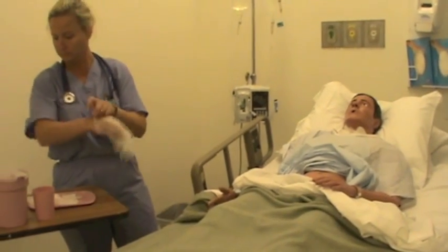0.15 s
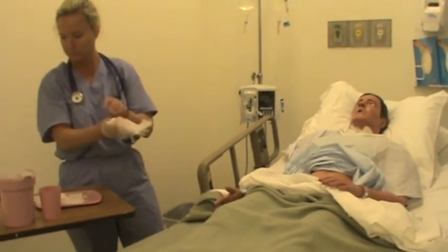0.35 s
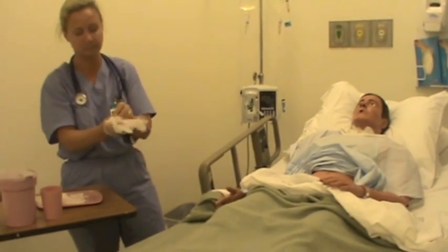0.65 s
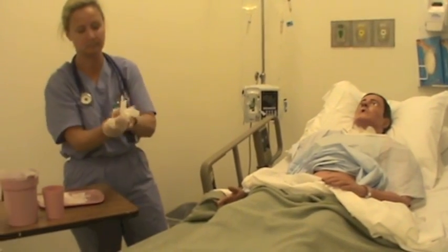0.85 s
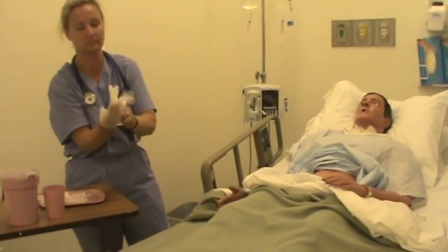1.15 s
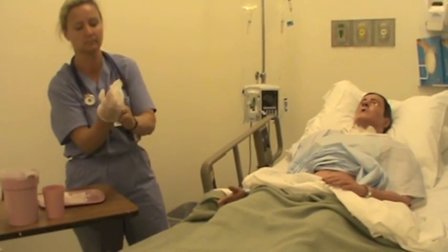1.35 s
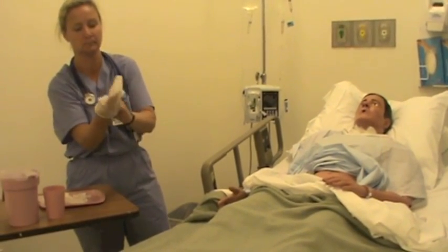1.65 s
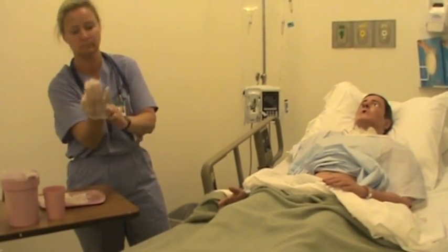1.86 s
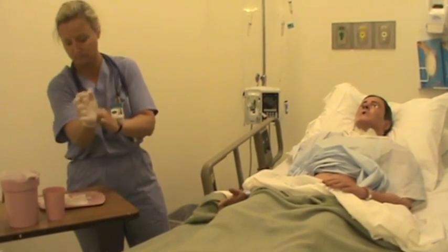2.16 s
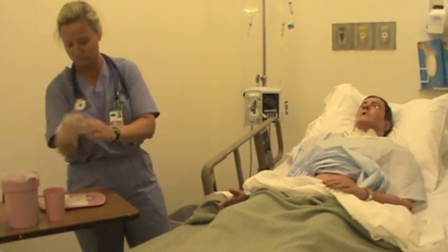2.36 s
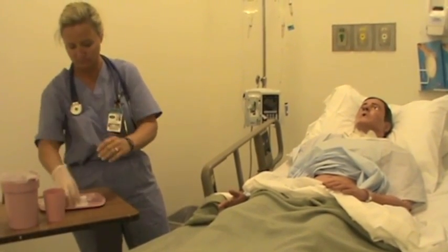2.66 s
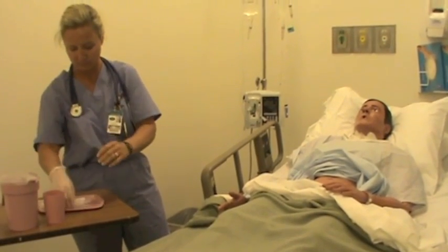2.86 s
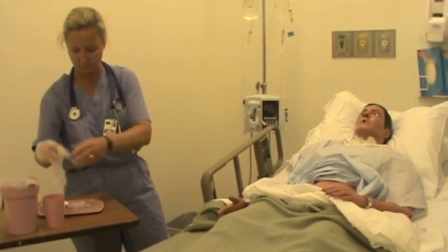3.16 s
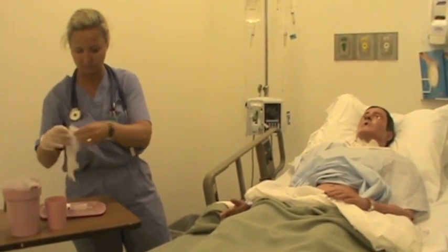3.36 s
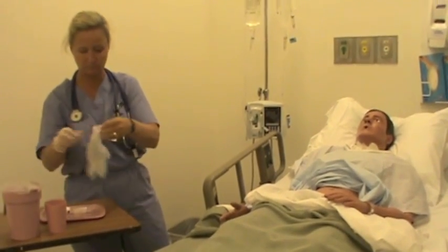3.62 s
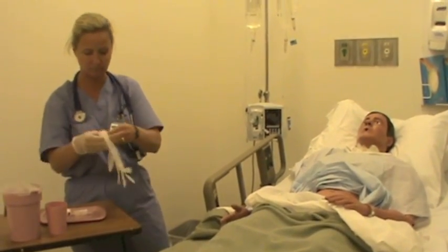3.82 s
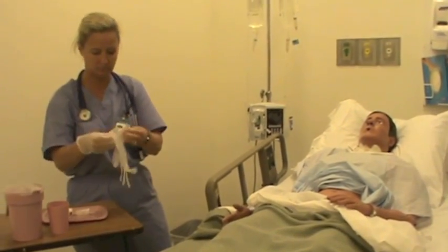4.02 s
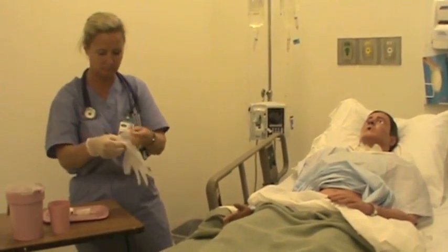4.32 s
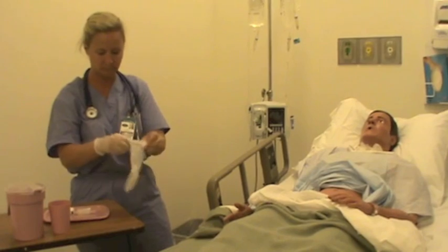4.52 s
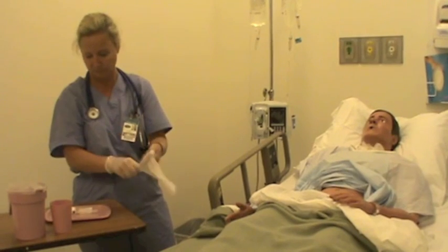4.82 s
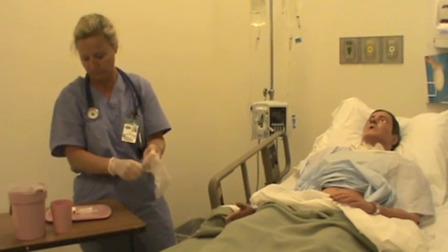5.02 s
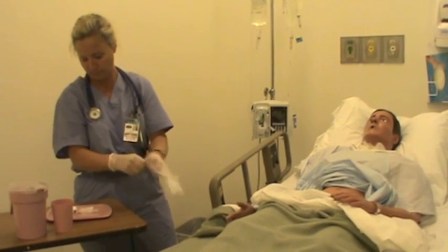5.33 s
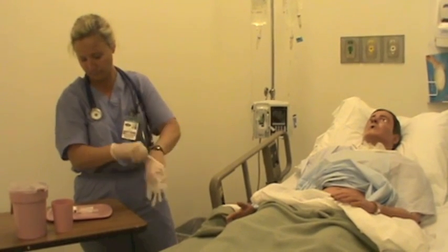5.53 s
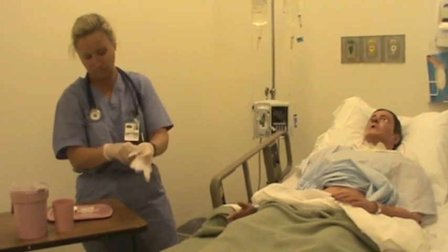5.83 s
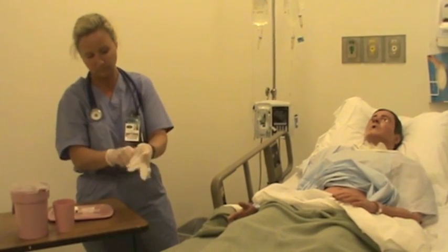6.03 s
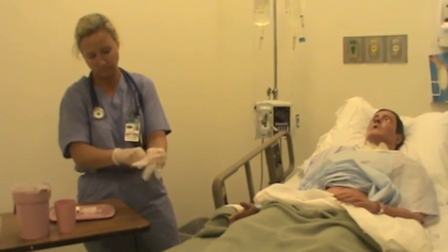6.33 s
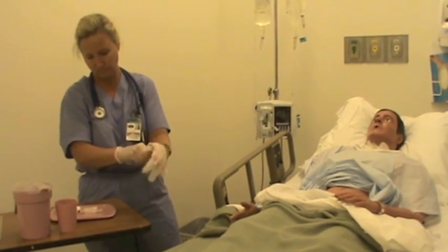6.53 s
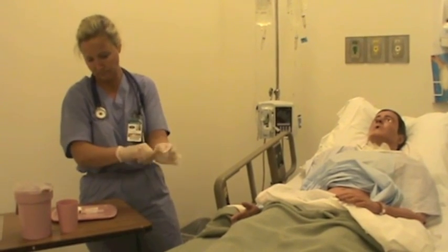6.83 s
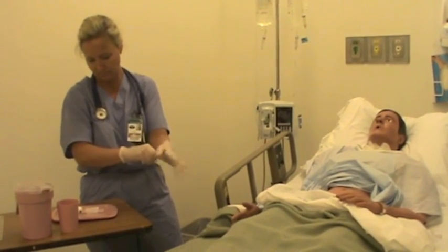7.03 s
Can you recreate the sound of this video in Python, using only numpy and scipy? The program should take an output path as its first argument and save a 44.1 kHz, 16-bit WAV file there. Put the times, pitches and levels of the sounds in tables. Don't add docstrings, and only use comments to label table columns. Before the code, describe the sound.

In a small quiet hospital room, thin stretchy gloves are pulled on close to a stereo microphone, slightly left. Rustling and an early cuff snap lead through pops to a hard, bright snap near two seconds. A quieter pause brings a few slaps, then the second glove crinkles, snaps and squeaks. Ventilation hums softly, and faint rapid motor ticks fade early.

```python
import sys
import numpy as np
from scipy import signal
from scipy.fft import rfft, irfft, next_fast_len
from scipy.io import wavfile
from scipy.ndimage import uniform_filter1d

SR = 44100
rng = np.random.default_rng(int(sys.argv[2]) if len(sys.argv) > 2 else 0)


def persist_wave(psi):
    counts = np.round(np.clip(psi, -1, 1) * 32767).astype(np.int16)
    wavfile.write(sys.argv[1], SR, np.atleast_2d(counts).T)


def ratio(d):
    e = np.asarray(d, float) / 20
    return 10 ** e


N = 316638


def evened(x):
    return x / np.sqrt(np.mean(x ** 2) + 1e-20)


def read(points, hz):
    f, value = np.transpose(points)
    return np.interp(np.log(hz + 1), np.log(f + 1), value)


def add(mix, s, sound):
    part = mix[round(s * SR):][:len(sound)]
    part += sound[:len(part)]


def band(x, lo_hz, hi_hz, order):
    sos = signal.butter(order, [lo_hz, hi_hz], "bandpass", fs=SR, output="sos")
    y = signal.sosfilt(sos, x)
    return y / abs(y).max()


def diffuse(pair, size):
    # (frequency [Hz], likeness [-1 to 1])
    likeness = [(60, 1), (130, 0.99), (290, 0.92), (640, 0.61), (1410, -0.52), (3100, 0.05), (6820, -0.039),
                (15000, 1)]
    hz, t, (a, b) = signal.stft(pair, SR, nperseg=size)
    same = np.clip(read(likeness, hz), -1, 1)[:, None]
    return hz, t, np.array([a, same * a + np.sqrt(1 - same ** 2) * b])


def air():
    # (frequency [Hz], level per Hz [dB])
    air_curve = [(12, -42), (20, -6.5), (68, 0), (158, -3), (260, -5), (354, -11), (618, -15), (772, -18.5),
                 (1510, -25), (1780, -26), (2290, -27.5), (5440, -30.5), (7190, -31), (9240, -33),
                 (15700, -37.5)]
    # (frequency [Hz], width [Hz], boost or cut [dB])
    ducts = [(37.7, 11.3, -8.5), (54, 17, 1.5), (84.6, 16, 0.5), (165.2, 12, 11), (449, 53, 2.5),
             (626, 63, 2.5), (1950, 230, 4.5)]
    level_db = -47.5
    hz, t, z = diffuse(rng.standard_normal((2, N)), size=4096)
    ducts_db = sum(db / (1 + (2 * (hz - f) / width) ** 2) for f, width, db in ducts)
    z = z * ratio(read(air_curve, hz) + ducts_db)[:, None]
    noise = signal.istft(z, SR, nperseg=4096)[1][:, :N]
    return ratio(level_db) * evened(noise)


def high_whine():
    whine_hz, whine_db = 15734, -83
    return ratio(whine_db) * np.sin(2 * np.pi * whine_hz * np.arange(N) / SR)


def zoom_motor():
    # (time [s], level [dB])
    tick_levels = [(.2, -58), (.4, -50), (.6, -51), (.75, -52), (1.05, -52), (1.5, -56), (1.7, -70)]
    first_s, steps_per_s, ring_hz, peak_s = .2065, 29.97, 2370, .003
    at = np.arange(first_s, tick_levels[-1][0], 1 / steps_per_s)
    levels_db = np.interp(at, *np.transpose(tick_levels)) + 1.5 * rng.standard_normal(len(at))
    t = np.arange(900) / SR
    ring = np.sin(2 * np.pi * ring_hz * t) * t / peak_s * np.exp(1 - t / peak_s)
    out = np.zeros(N)
    for s, db in zip(at, levels_db):
        add(out, s, ratio(db - 3.5) * ring)
    return np.array([1.4 * out, -.2 * out])


def ward(x):
    # (frequency [Hz], time [s])
    fading = [(300, 0.2), (700, 0.16), (1700, 0.14), (4600, 0.15), (12000, 0.18)]
    # (delay [ms], level [dB])
    echoes = [
        (3.4, -21),
        (7.5, -15),
        (12.5, -32),
        (18, -23.5),
        (27, -32),
    ]
    taps = np.zeros((2, SR // 2))
    slots = np.arange(300, SR // 2 - 20, 20)
    at = slots + rng.integers(0, 20, (2, len(slots)))
    np.put_along_axis(taps, at, rng.choice([-1., 1.], at.shape), 1)
    hz, t, z = diffuse(taps, size=256)
    z = z * ratio(-60 * t / read(fading, hz)[:, None])
    tail = signal.istft(z, SR, nperseg=256)[1]
    tail = ratio(-8.0) * tail / np.linalg.norm(tail[0])
    for k, (ms, db) in enumerate(echoes):
        at_ports = np.array([[1, 0], [0.025, (-1) ** k]])
        tail[:, round(ms * SR / 1000) + np.array([0, 9])] += ratio(db) * at_ports
    return signal.fftconvolve(x[None], tail, axes=1)[:, :N]


def ports(x):
    # (frequency [Hz], phase [radians])
    lead = [(0, -0.8), (1210, 1.2), (2840, 0.79), (5770, 0.48), (7410, 1.37), (10400, -1.3), (12400, -0.61),
            (16500, -0.087)]
    # (frequency [Hz], level [dB])
    left_extra = [(60, 0), (550, 0), (1500, 1.5), (3100, 1.5), (7000, 2), (11000, .5), (15000, 0)]
    size = next_fast_len(N)
    hz = np.fft.rfftfreq(size, 1 / SR)
    step = ratio(read(left_extra, hz) / 2) * np.exp(.5j * read(lead, hz))
    return irfft(rfft(x, size) * np.array([step, 1 / step]), size)[:, :N]


def strokes(t, low, high):
    # (peak time [s], level [dB], rise [ms], fall [ms], brightness [dB])
    first_glove = [(.005, -52.5, 30, 47, 5), (.115, -52, 74, 61, 2.5), (.2, -54.5, 53, 49, 3.5),
                   (.37, -54.5, 88, 144, 1), (.65, -62.5, 60, 71, -8), (.8, -58.5, 90, 130, 5),
                   (.98, -59.5, 130, 60, -11), (1.11, -52, 96, 140, -3), (1.23, -49.5, 150, 72, -3),
                   (1.36, -56, 80, 100, -3.5), (1.52, -53, 58, 160, -1), (1.64, -54.5, 59, 90, -1),
                   (1.761, -47, 74, 37, -4.5), (1.87, -48.5, 110, 104, 6), (2.05, -47, 85, 145, -1),
                   (2.16, -59, 60, 29, 2), (2.39, -57, 85, 90, 4.5), (2.52, -64, 50, 70, -5)]
    picking_up = [(2.76, -51, 30, 120, -4), (2.93, -63, 30, 50, -17), (3.17, -56.5, 40, 107, -2),
                  (3.42, -59, 50, 50, 2), (3.53, -55, 69, 80.4, 2.5), (3.62, -59.5, 50, 96, 2),
                  (3.83, -62, 30, 60, -3), (3.95, -65.5, 80, 100, 0), (4.25, -62.5, 50, 90, 6),
                  (4.41, -60, 30, 70, 5), (4.51, -58.5, 60, 60, 3.5), (4.61, -62.5, 30, 40, 9),
                  (4.74, -63.5, 70, 50, 6), (4.91, -65.5, 40, 90, 12)]
    second_glove = [(5.1, -56, 70, 80, 4), (5.22, -51.5, 71.5, 128, -1.5), (5.42, -54, 90, 90, 5.5),
                    (5.56, -57, 70, 80, 6), (5.71, -55.5, 60, 90, 1), (5.92, -57.5, 70, 80, -0.5),
                    (6.04, -61, 50, 40, 2), (6.165, -55, 60, 70.4, -2.5), (6.34, -52.5, 80, 113, -0.5),
                    (6.5, -53.5, 102, 103, -0.5), (6.65, -50.5, 84, 80, 0.5), (6.76, -50.5, 70, 100, 0),
                    (6.9, -50.5, 100, 80, 4.5), (7.01, -48, 90, 61, 4), (7.12, -55.5, 60, 110, 3)]
    folds = [
        0.5,
        -4.5,
        0.5,
    ]
    drop_db, bend = 8.5, 1.53
    dulling = 0.27
    power = 0
    for task, folds_db in zip((first_glove, picking_up, second_glove), folds):
        for s, db, rise_ms, fall_ms, bright_db in task:
            away = np.maximum((s - t) / rise_ms, (t - s) / fall_ms) * 1000
            colour_db = low * (folds_db - dulling * bright_db) + high * bright_db
            power = power + ratio(db - drop_db * away ** bend + colour_db) ** 2
    return np.sqrt(power)


def rustle():
    # (frequency [Hz], level per Hz [dB])
    film = [(410, -6.5), (700, -4), (873, -6), (1720, -1), (2440, -3), (3250, -2), (5920, -3), (7290, -5.5),
            (11500, -10.5), (15700, -20)]
    crinkles_per_s = 2500
    sizes = ratio(3.5 * np.minimum(rng.exponential(1, N), 5)) * rng.standard_normal(N)
    crinkles = evened(sizes * (rng.random(N) < crinkles_per_s / SR))
    rubbing = .55 * crinkles + .9 * rng.standard_normal(N)
    hz, t, z = signal.stft(rubbing, SR, nperseg=256, noverlap=192)
    octave = np.log2(hz + 1)[:, None]
    low = np.clip((np.log2(3000) - octave) / 0.39, 0, 1)
    high = np.clip((octave - np.log2(5000)) / 1.24, 0, 1.8)
    patches = uniform_filter1d(rng.standard_normal(z.shape), 5, axis=0)
    patches = evened(uniform_filter1d(patches, 20, axis=1))
    grips = evened(uniform_filter1d(rng.standard_normal(len(t)), 10))
    colour_db = read(film, hz)[:, None] + 1.27 * patches + 1.15 * grips
    z = z * ratio(colour_db) * strokes(t, low, high)
    return ratio(7) * signal.istft(z, SR, nperseg=256, noverlap=192)[1][:N]


def drags():
    # (time [s], length [s], level [dB], lowest [Hz], highest [Hz])
    drag_list = [(0.982, 0.1, -58, 1460, 1780), (1.141, 0.063, -52.5, 1590, 2380),
                 (1.078, 0.031, -44.5, 1500, 6400), (2.724, 0.045, -50.5, 1690, 3570),
                 (5.067, .018, -52, 1710, 3200), (5.083, 0.038, -48, 1600, 3260),
                 (5.721, 0.02, -50, 800, 8040), (5.117, 0.055, -49, 1500, 3400),
                 (5.19, 0.047, -48, 1270, 2670), (6.291, .06, -54.5, 2100, 3150),
                 (6.415, 0.081, -53.5, 1250, 1900), (6.597, 0.06, -55, 2680, 3440),
                 (6.856, 0.04, -56, 2580, 3220)]
    out = np.zeros(N)
    for s, length_s, db, lo_hz, hi_hz in drag_list:
        noise, jerks = rng.standard_normal((2, 8192))
        grip = noise * ratio(3.5 * evened(uniform_filter1d(jerks, 130)))
        sound = evened(band(grip, lo_hz, hi_hz, order=3))[:round(length_s * SR)]
        swell = signal.windows.tukey(len(sound), .6)
        add(out, s, ratio(db) * sound * swell)
    return out


def crack(peak_db, lo_hz, hi_hz, thump_db, dies_ms):
    noise = rng.standard_normal(2048)
    t = np.arange(len(noise)) / SR
    slips = noise + 4.0 * (t == 0)
    burst = slips * ratio(-60 * t / (dies_ms / 1000))
    slow = slips * ratio(-60 * t / (dies_ms / 500))
    thump = ratio(thump_db) * band(slow, 440, 1550, order=2)
    rough = burst * np.sign(noise[::-1])
    sizzle = ratio(-11) * band(rough, .9 * hi_hz, min(2.5 * hi_hz, 15500), order=1)
    return ratio(peak_db) * (band(burst, lo_hz, hi_hz, order=3) + thump + sizzle)


def rings():
    # (time [s], peak level [dB], pitch [Hz], dying time [ms])
    ring_list = [(0.2833, -28, 3950, 12), (.285, -36, 1300, 16), (1.9975, -23, 600, 9),
                 (2.003, -30, 1170, 14), (2.003, -33, 880, 14), (2.735, -41, 560, 50),
                 (3.0965, -37, 2600, 16), (3.112, -37, 432, 22), (3.112, -31, 610, 22),
                 (3.116, -33, 880, 18), (3.128, -39, 3870, 28), (1.9975, -22, 6500, 6),
                 (3.1112, -22, 6700, 6), (3.1172, -21, 6000, 6), (3.1155, -34, 780, 20)]
    width_hz = 260
    out = np.zeros(N)
    for s, db, hz, ms in ring_list:
        add(out, s, crack(db, hz - width_hz / 2, hz + width_hz / 2, -24, ms))
    return out


def pops():
    # (time [s], peak level [dB], pitch [Hz])
    pop_list = [(1.1794, -28, 2210), (1.2216, -22, 3830), (1.2526, -25.5, 2200), (1.4815, -32, 3280),
                (1.6452, -26.5, 3180), (1.7469, -33, 3100), (1.9394, -46, 3020), (3.4181, -37.5, 3050),
                (3.8207, -37, 3150), (4.3989, -44, 5840), (4.6694, -44, 5850), (5.2194, -35, 2400),
                (5.4136, -29, 1750), (5.682, -34.5, 1950), (5.9045, -37, 1730), (5.9843, -32, 3280),
                (6.3215, -30, 1950), (6.4298, -34, 1470), (6.4637, -29, 1590), (6.5096, -34, 1980),
                (6.5321, -33, 1600), (6.5799, -31, 1700), (6.7351, -28, 2650), (6.8894, -28, 4530),
                (7.0044, -39, 6030)]
    out = np.zeros(N)
    for s, db, hz in pop_list:
        add(out, s, crack(db - 9.5, hz / 1.48, hz * 1.3, thump_db=-14, dies_ms=7))
    return out


def slaps():
    # (time [s], peak level [dB], pitch [Hz], dying time [ms])
    slap_list = [(.361, -36, 900, 28), (1.068, -35, 1610, 7), (2.0008, -13, 2200, 9),
                 (2.005, -27, 1350, 18), (2.013, -26.5, 4500, 49), (2.713, -50, 3900, 5),
                 (2.722, -43, 3500, 12), (2.739, -35, 4300, 71), (2.726, -29.5, 1280, 42),
                 (2.729, -25, 2920, 16), (2.735, -33, 1700, 18), (2.7385, -35, 700, 90),
                 (3.0087, -40, 1250, 16), (3.1124, -19.5, 2500, 27), (3.119, -35, 800, 22),
                 (3.124, -32, 7460, 54), (5.068, -32, 2190, 4.6), (5.071, -38.5, 2460, 12),
                 (5.086, -35, 2400, 19), (5.098, -35.5, 2270, 25), (5.134, -31, 2700, 14),
                 (5.1395, -38, 2900, 8), (5.147, -30.5, 2100, 11), (5.151, -38, 2600, 16),
                 (5.176, -46, 1900, 12), (5.1931, -21, 2050, 5), (5.1955, -27.5, 2500, 40)]
    spread = 1.45
    out = np.zeros(N)
    for s, db, hz, ms in slap_list:
        add(out, s, crack(db, hz / spread, hz * spread, -20, ms))
    return out


def cuff_snaps():
    # (time [s], peak level [dB], lowest [Hz], highest [Hz], loss per flap [dB])
    snap_list = [(0.2824, -15.5, 4330, 10300, 10), (.3437, -31, 1500, 6550, 5),
                 (1.0792, -27, 1520, 6100, .1), (1.9974, -12.5, 2500, 9000, 7),
                 (1.9997, -12, 3600, 8800, 12), (2.7266, -23.5, 1100, 9700, 3.5),
                 (2.9264, -41, 900, 7000, 12), (3.097, -30.5, 3180, 7700, 14),
                 (3.1106, -16.5, 4800, 10300, .1), (5.1929, -28, 2000, 7500, 8),
                 (5.7239, -26.5, 890, 9200, 8)]
    flap_s = 0.0036
    out = np.zeros(N)
    for s, db, lo_hz, hi_hz, loss_db in snap_list:
        for k in range(3):
            flap = crack(db - k * loss_db, lo_hz, hi_hz, thump_db=-13, dies_ms=13.5)
            add(out, s + k * flap_s, flap)
    return out


def scene():
    background = air() + high_whine() + zoom_motor()
    gloves = rustle() + drags() + rings() + pops() + slaps() + cuff_snaps()
    return background + ward(gloves) + ports(gloves)


def roll_off(x):
    return signal.sosfilt(signal.butter(12, 16990, fs=SR, output="sos"), x)


def record(dry):
    edge_hz = 15900
    limit = signal.firwin(401, edge_hz, window=("kaiser", 8), fs=SR)
    mix = signal.oaconvolve(dry, limit[None], "same", axes=1)
    return roll_off(mix)


dry = scene()
out = record(dry)
persist_wave(out)
```